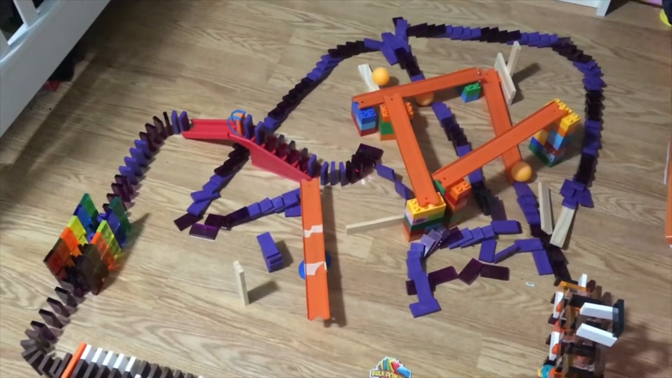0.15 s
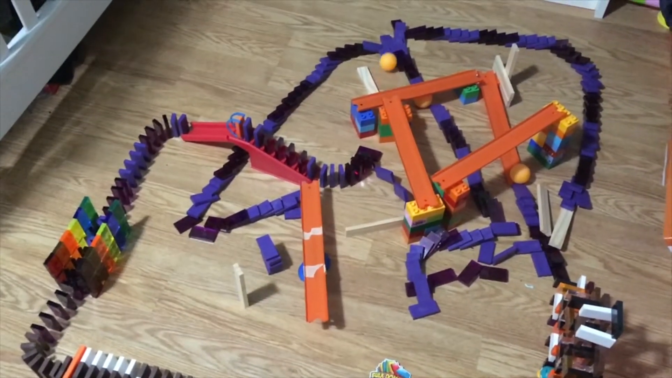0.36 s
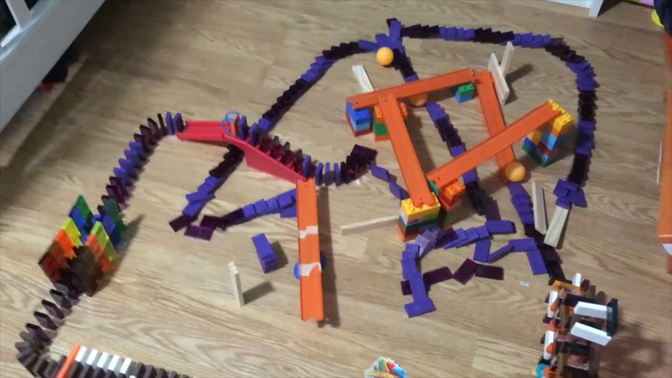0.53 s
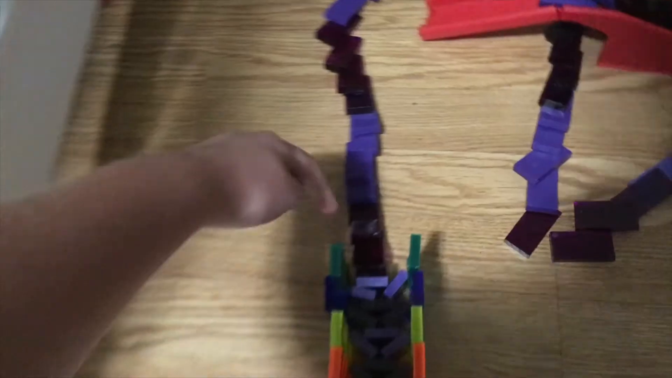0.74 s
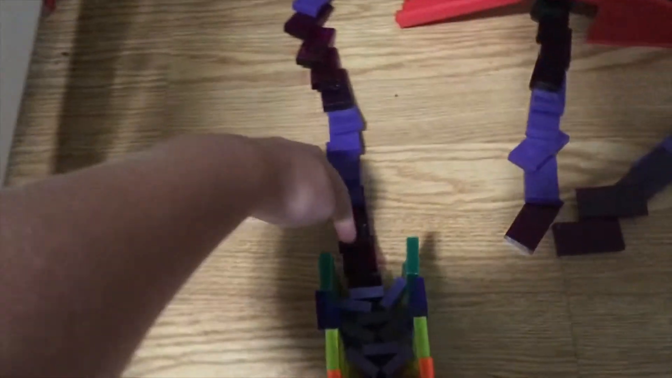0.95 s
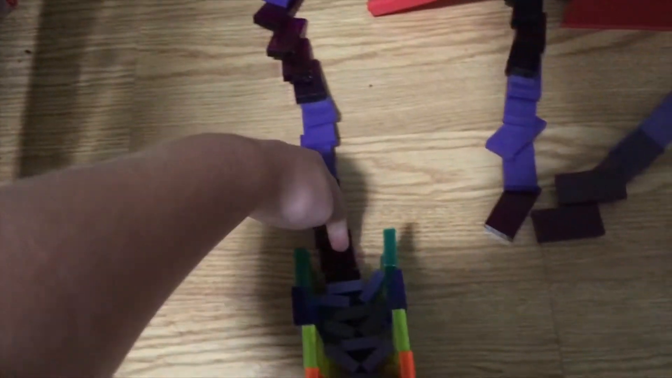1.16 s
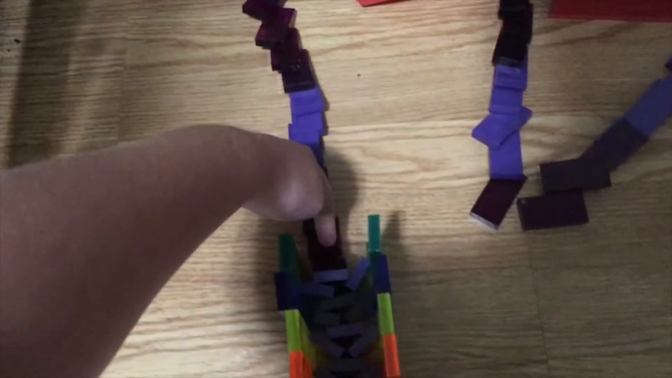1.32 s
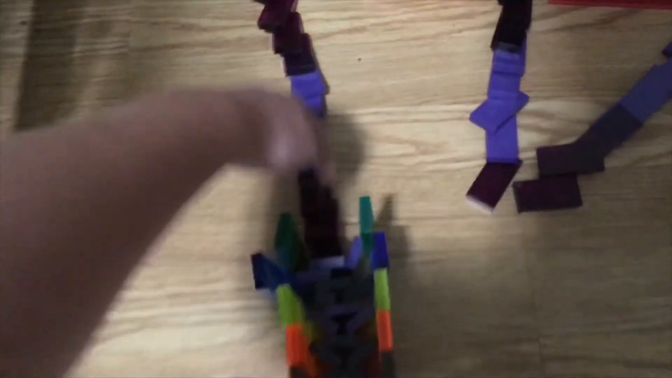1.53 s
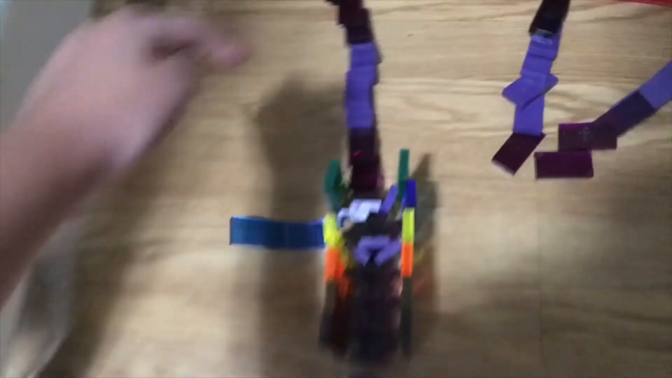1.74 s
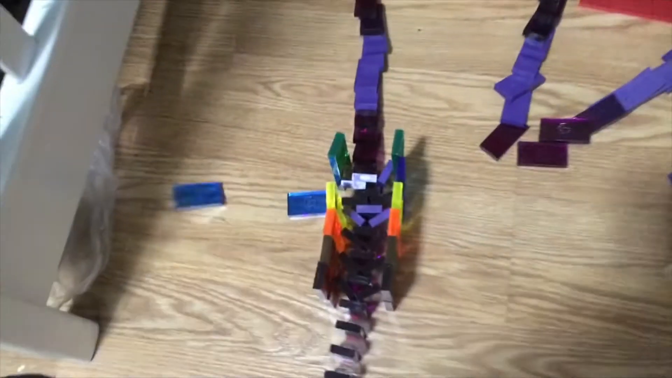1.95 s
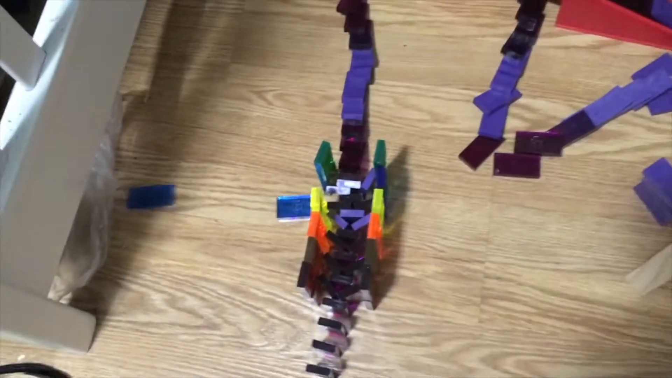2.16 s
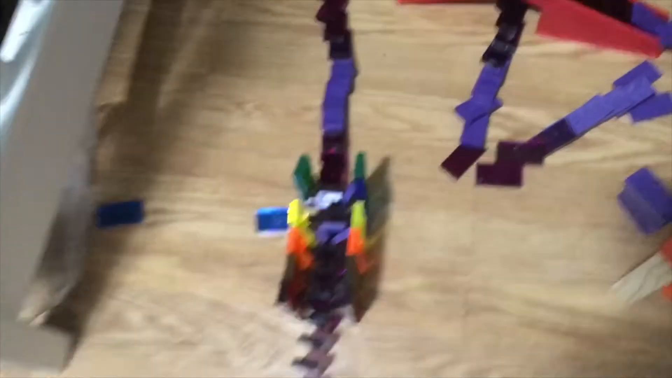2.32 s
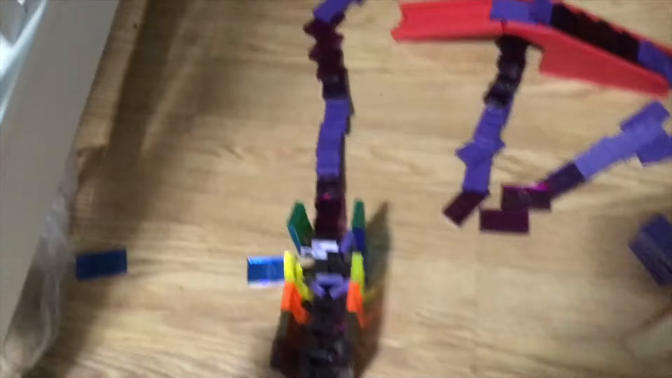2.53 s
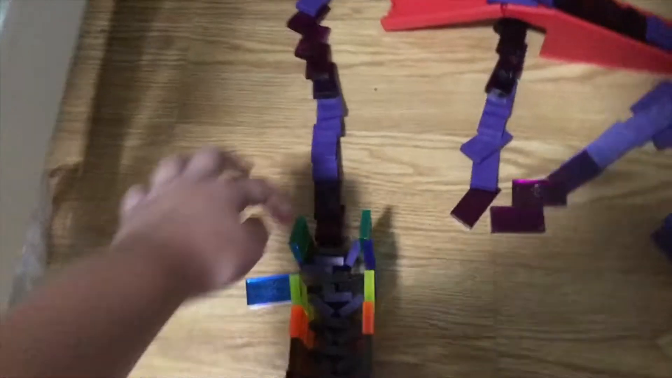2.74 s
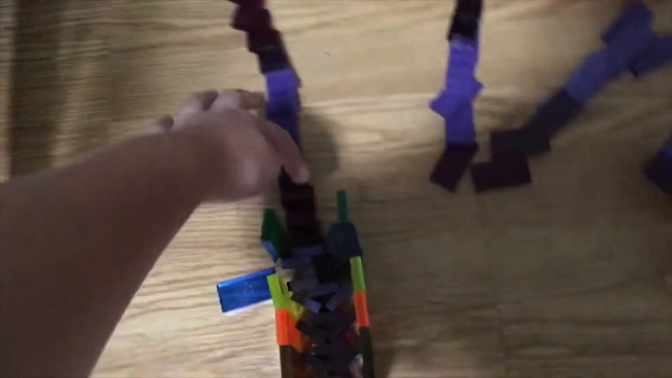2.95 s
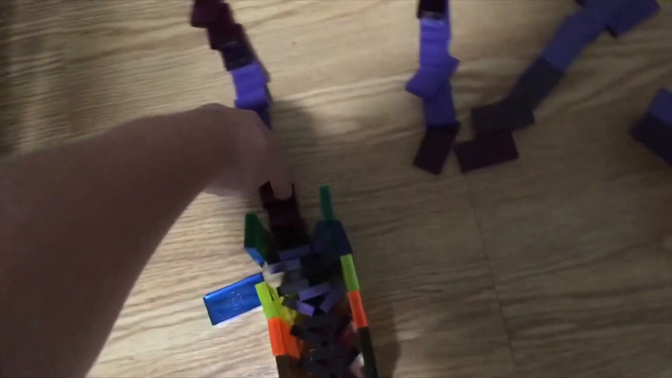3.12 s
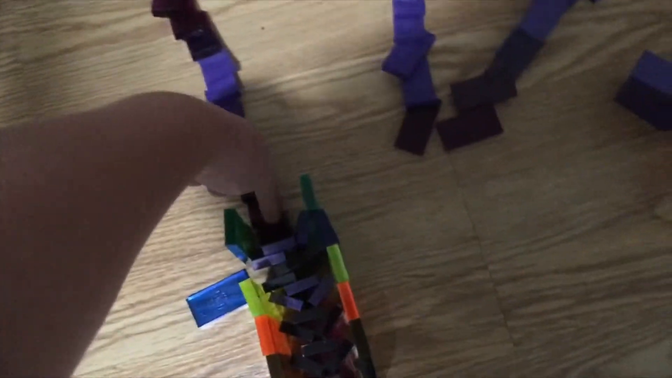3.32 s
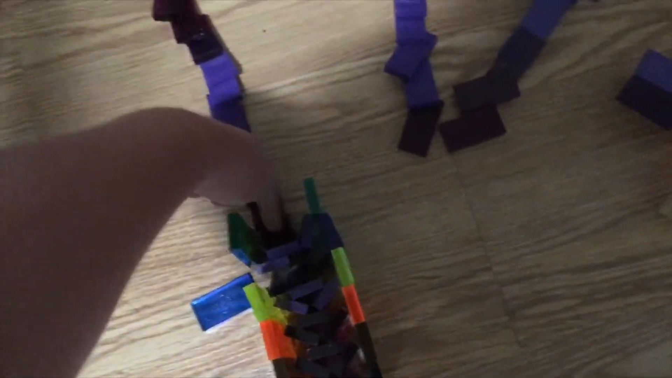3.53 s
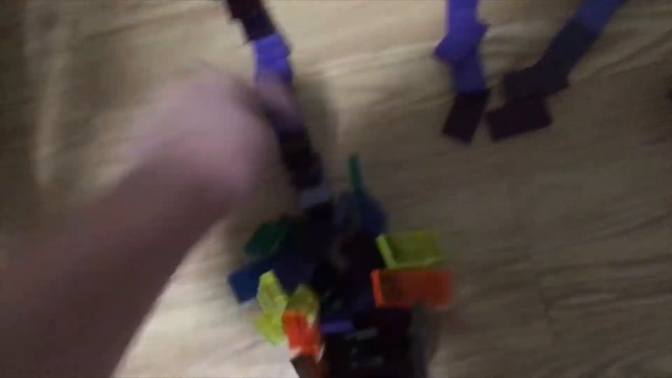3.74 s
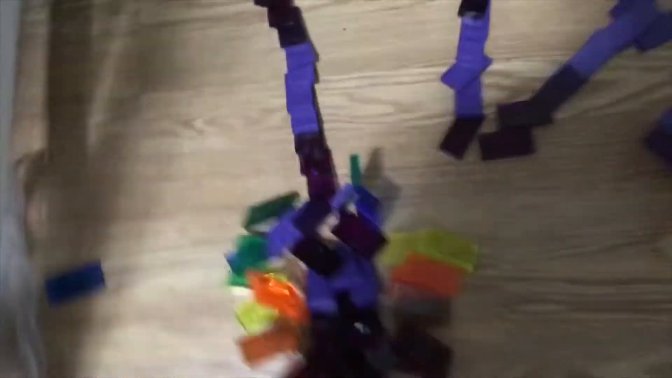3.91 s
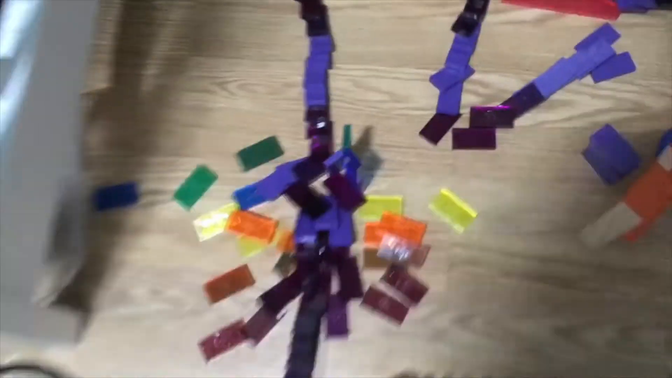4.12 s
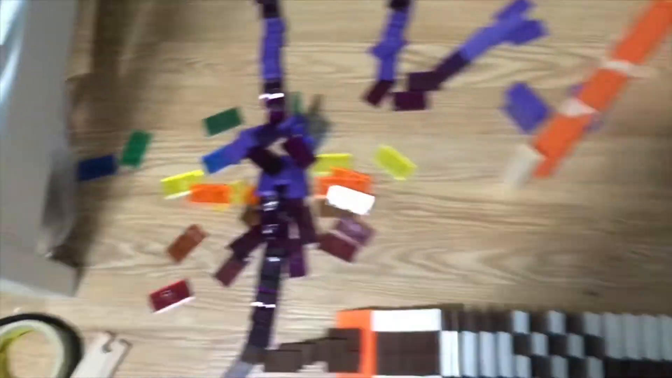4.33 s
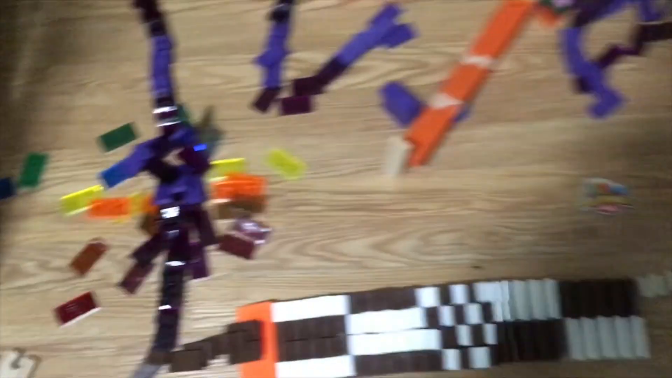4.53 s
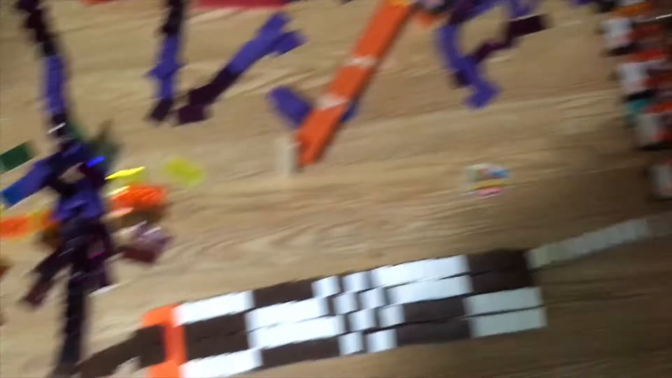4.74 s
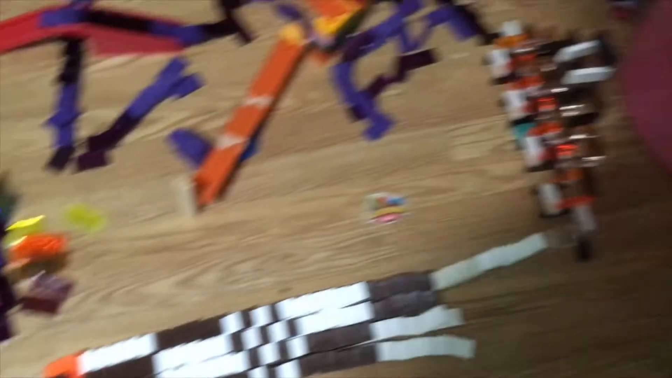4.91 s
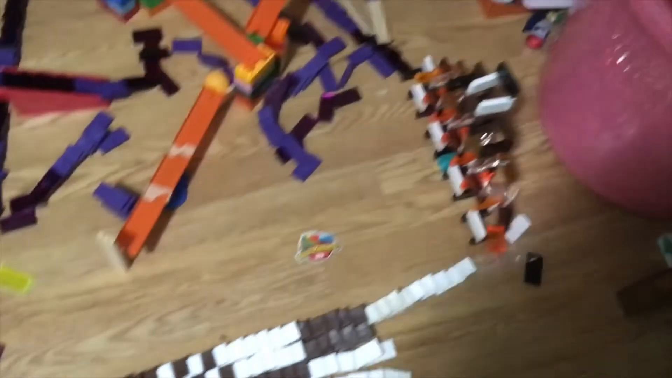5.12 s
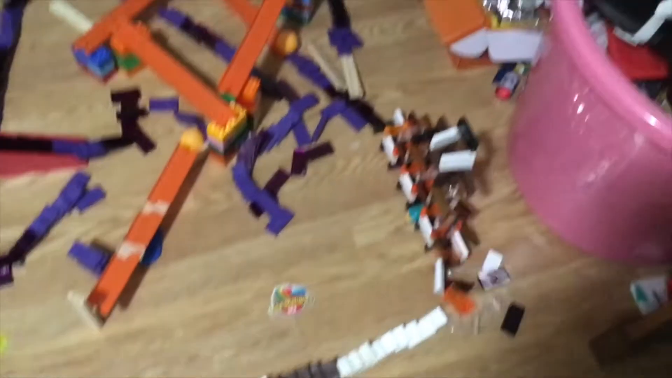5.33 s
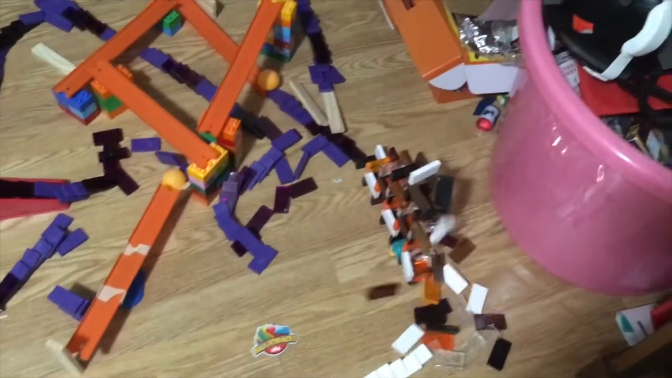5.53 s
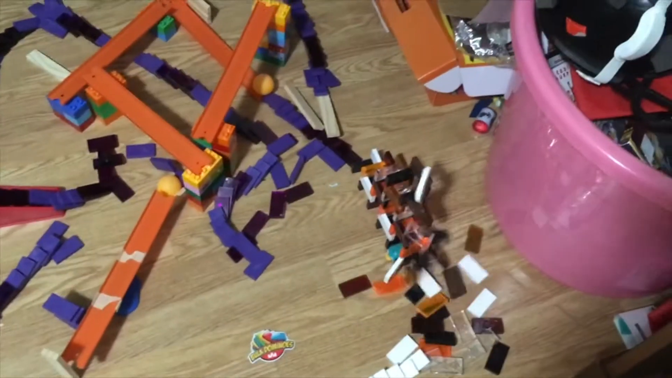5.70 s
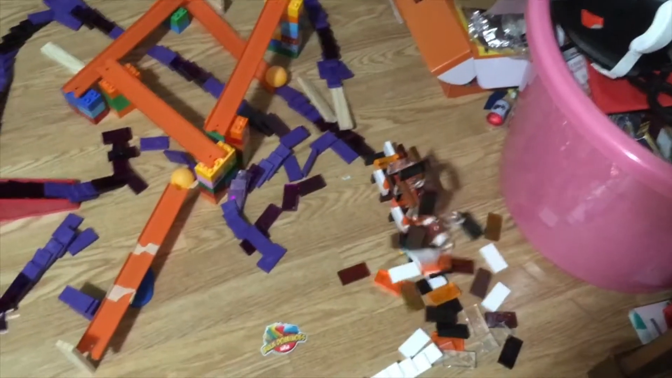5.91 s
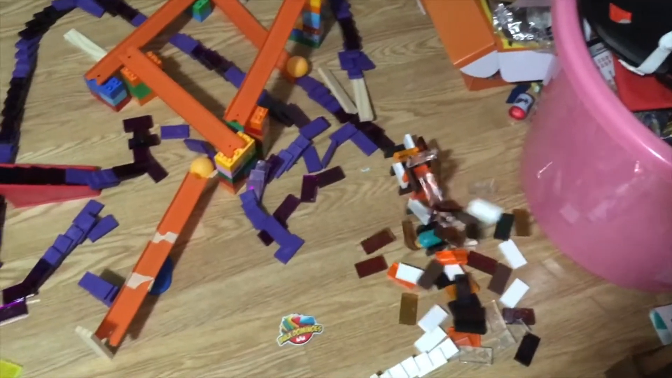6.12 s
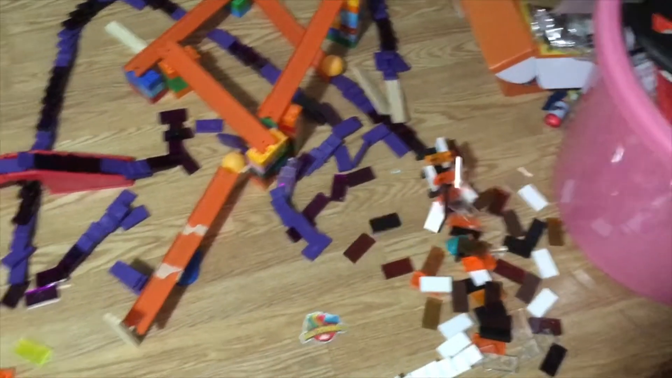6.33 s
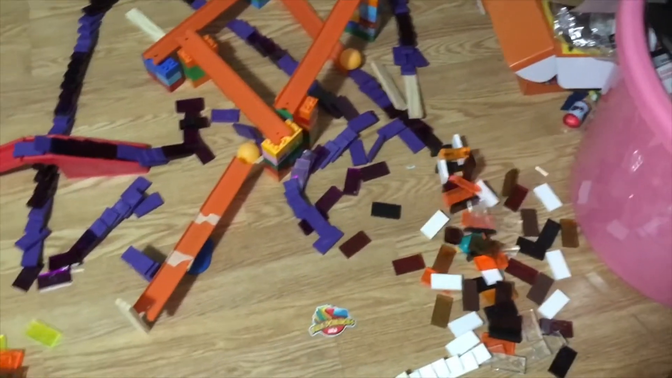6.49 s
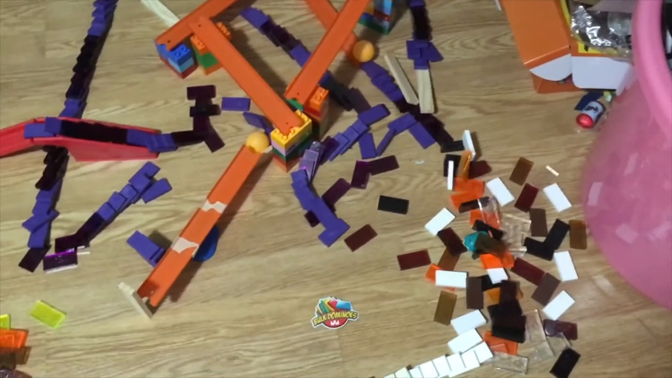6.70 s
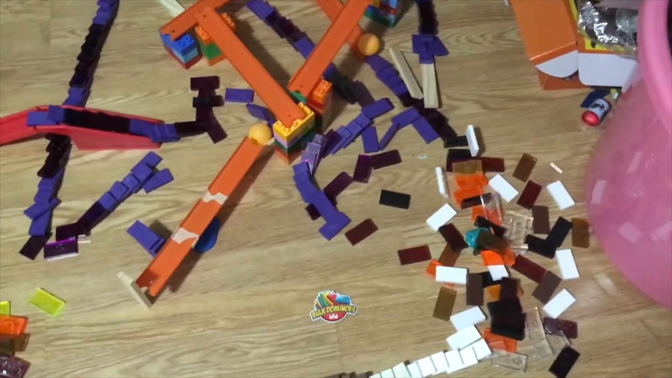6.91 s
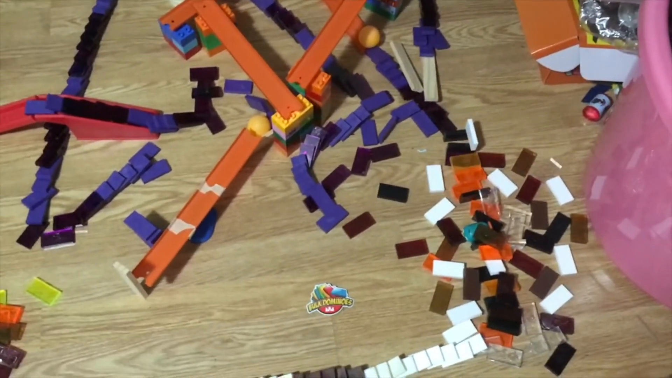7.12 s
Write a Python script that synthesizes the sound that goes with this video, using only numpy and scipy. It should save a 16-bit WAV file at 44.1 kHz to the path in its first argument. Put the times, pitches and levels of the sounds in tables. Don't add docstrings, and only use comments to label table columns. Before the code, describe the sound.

Wooden knocks, a loose plastic tile skittering, then a domino chain toppling in a fast rippling rattle and a long crumbling clatter indoors.

```python
import sys
import numpy as np
from scipy import signal
from scipy.fft import rfft, irfft
from scipy.io import wavfile
from scipy.ndimage import uniform_filter1d, minimum_filter1d

SR = 44100
rng = np.random.default_rng(int(sys.argv[2]) if len(sys.argv) > 2 else 0)


def level_to_linear(level):
    exponent = np.asarray(level, float) / 20
    return 10 ** exponent


def wav_out(sig):
    wavfile.write(sys.argv[1], SR, np.round(np.clip(np.atleast_2d(sig).T, -1, 1) * 32767).astype(np.int16))


N = 320166
NOW_S = np.arange(N) / SR


def rms_one(x):
    return x / np.sqrt(np.mean(x ** 2) + 1e-20)


def filtered(x, order, kind, hz):
    return signal.sosfilt(signal.butter(order, hz, kind, fs=SR, output="sos"), x)


def curve_db(points):
    s, level_db = np.transpose(points)
    return np.interp(NOW_S, s, level_db, left=-140, right=-140)


def clicks(s, level_db):
    out = np.full(N, 1e-12)
    np.add.at(out, (np.asarray(s) * SR).astype(int), level_to_linear(level_db))
    return out


def grains(per_s, spread_db):
    sizes = level_to_linear(spread_db * np.minimum(rng.exponential(1, N), 4)) * rng.choice([-1, 1], N)
    return rms_one(sizes * (rng.random(N) < per_s / SR)) + 1e-12


def contact(train, ms, per_s, first=2.2):
    decay = signal.lfilter([1], [1, -np.exp(-1000 / (ms * SR))], train)
    return first * train + decay * grains(per_s, spread_db=4.0)


def uneven_gain(level_db, spread_db, step, length):
    drawn_db = level_db + spread_db * rng.standard_normal(N // step + 1)
    return np.repeat(level_to_linear(drawn_db), step)[:length]


def body(x, resonances, uneven_db=1.4):
    out, power = 0, 0
    for k, (hz, width_hz, level_db) in enumerate(resonances):
        r = np.exp(-np.pi * width_hz / SR)
        b = np.array([1, 0, -1]) * (1 - r * r) / 2
        a = [1, -2 * r * np.cos(2 * np.pi * hz / SR), r * r]
        driven = x * uneven_gain(level_db, uneven_db, SR // 80, N)
        out = out + (-1) ** k * signal.lfilter(b, a, driven)
        power += level_to_linear(2 * level_db) * np.pi * width_hz / SR
    return out / np.sqrt(power)


def ringing(x, modes, detune, count):
    struck, step = np.flatnonzero(x), SR // 150
    start = struck[0]
    part = x[start:struck[-1] + SR // 5]
    out, length = np.zeros(N), len(part)
    dealt = np.repeat(rng.integers(0, count, N // step + 1), step)[:length]
    for tile, offset in enumerate(np.linspace(-detune, detune, count)):
        mine = part * (dealt == tile) + 1e-18
        for hz, level_db, t60_s in modes:
            r, w = level_to_linear(-60 / (t60_s * SR)), 2 * np.pi * hz * (1 + offset) / SR
            driven = mine * uneven_gain(level_db, 3, step, length)
            ring = signal.lfilter([0, np.sin(w)], [1, -2 * r * np.cos(w), r * r], driven)
            out[start:start + length] += ring
    return out


# (frequency [Hz], density [dB/Hz])
HISS = [(88, -31), (150, -1.5), (186, -8), (483, -17), (974, -22), (1300, -22.5), (2680, -31), (15800, -36)]
# (time [s], level [dB])
HANDLING = [(0.0, -78), (0.04, -65), (0.87, -67.5), (0.99, -59.5), (1.23, -68.5), (1.37, -52),
            (1.43, -62.5), (3.32, -66.5), (3.94, -57), (4.29, -72), (4.55, -56.5), (4.97, -68), (7.26, -69)]


def hush():
    hz = np.fft.rfftfreq(N, 1 / SR)
    log_hz, density_db = np.log(np.array(HISS)[:, 0]), np.array(HISS)[:, 1]
    gain = level_to_linear(np.interp(np.log(hz + 1), log_hz, density_db)) * (hz > 140)
    gain = gain * (1 + .5 * (hz / 13000) ** 4)
    hiss = rms_one(irfft(rfft(rng.standard_normal(N)) * gain, N))
    rumble = rms_one(filtered(rng.standard_normal(N), 2, "band", [36, 125]))
    s, rumble_db = np.transpose(HANDLING)
    return level_to_linear(-67.5) * hiss + level_to_linear(np.interp(NOW_S, s, rumble_db)) * rumble


# (time [s], knock [dB], tick [dB])
BLOCK = [(0.003, -32, -21.5), (0.1641, -18.5, -9.5), (0.1895, -59, -40.5), (0.278, -26.5, -24),
         (0.329, -33, -30), (0.395, -34, -29), (0.405, -44, -35), (0.42, -48, -55), (0.473, -46, -36.5),
         (0.518, -46.5, -55), (0.7107, -42.5, -33.5), (0.8, -59, -57), (0.021, -37, -38)]
# (time [s], level [dB])
BLOCK_ROLL = [(0.4, -42), (0.422, -49), (0.532, -52.5), (0.6, -81)]
# (frequency [Hz], width [Hz], level [dB])
WOOD = [(570, 190, 2.5), (1130, 740, 3.5), (1650, 1330, 1.5), (2630, 1820, -0.5), (3920, 1800, -7),
        (5440, 1200, -12.5)]
BLOCK_EDGE = [(4060, 2000, 0), (7110, 3500, -0.5), (11200, 4400, 2.5), (14600, 4200, -5.5)]
ROCKING = [(683, 250, 2), (1465, 550, 1.5), (2260, 620, -2.5), (4350, 270, -15)]
CASING = [(681, 340, -3), (1870, 1500, -7), (3510, 1100, -13)]


def wooden_block():
    s, knock_db, tick_db = np.transpose(BLOCK)
    far = NOW_S < .65
    knock = contact(clicks(s, knock_db + 7), ms=4.0, per_s=9900)
    tick = body(contact(clicks(s, tick_db - 6), ms=4.6, per_s=4800), BLOCK_EDGE)
    rocking = body(level_to_linear(curve_db(BLOCK_ROLL) - 2.5) * grains(810, spread_db=0.5), ROCKING)
    block = filtered(body(knock * far, WOOD) + rocking, 2, "high", 360) + tick * far
    touches = body(knock * ~far, CASING) + tick * ~far
    return block, touches


# (upper edge [Hz], level [dB], t60 [s])
ROOM = [(270, 3.5, 0.27), (700, -3, 0.26), (1830, 1, 0.2), (3760, 0.5, 0.22), (8200, -0.5, 0.2),
        (16100, -1, 0.13)]


def room(x):
    t, out, step = np.arange(SR // 2) / SR, 0, SR // 40
    spot = np.repeat(rng.integers(0, 4, N // step + 1), step)[:N]
    for k in range(4):
        tail, low_hz = 0, 90
        for high_hz, level_db, t60_s in ROOM:
            band = filtered(rng.standard_normal(len(t)), 2, "band", [low_hz, high_hz])
            decay = level_to_linear(-60 * t / t60_s) + 0.16 * level_to_linear(-32 * t / t60_s)
            tail = tail + band * level_to_linear(level_db) * decay
            low_hz = high_hz
        spectrum = rfft(tail, SR)
        power = np.abs(spectrum) ** 2
        even = np.sqrt(uniform_filter1d(power, size=800) / uniform_filter1d(power, size=100))
        tail = irfft(spectrum * even, SR)[:len(t)]
        onset = np.clip((t - .002) / 0.00055, 0, 1)
        out = out + signal.fftconvolve(x * (spot == k), tail * onset)[:N]
    return out


# (time [s], level [dB])
RUSTLE = [
    [(1.3, -93), (1.388, -91), (1.522, -78), (1.75, -68.5)],
    [(2.36, -71), (2.55, -63.5), (2.63, -59.5), (2.7, -56), (2.76, -66.5), (2.9, -86)],
]


def rustle():
    level = sum(level_to_linear(curve_db(span)) for span in RUSTLE)
    return level * signal.lfilter([1], [1, -.3], grains(6000, spread_db=-7.0))


# (time [s], knock [dB], tick [dB], ring [dB])
LOOSE = [(1.3361, -44.5, -56.5, -63), (1.4264, -29, -47, -39), (1.4532, -27, -16.5, -29.5),
         (1.668, -43.5, -65.5, -69), (1.7006, -72.5, -82.5, -68.5), (1.7853, -56.5, -61.5, -52.5),
         (1.8083, -8.5, -2.5, -2.5), (1.8135, -8.5, -21.5, -12), (1.8274, -7.5, -18, -5.5),
         (1.8543, -33, -32, -43), (1.8892, -29.5, -23.5, -19.5), (1.9085, -12.5, -48, -64),
         (1.936, -16, -68, -53.5), (1.9663, -24.5, -78, -56.5), (1.9985, -17, -34.5, -52),
         (2.03, -9.5, -10.5, -4.5), (2.0345, -31, -11.5, -28), (2.0395, -24, -19, -17.5),
         (2.065, -61, -60, -27), (2.122, -14.5, -31.5, -58), (2.138, -11, -9.5, -11),
         (2.1426, -30.5, -21, -10.5), (2.1987, -19.5, -25.5, -20), (2.2256, -26, -43.5, -36.5),
         (2.2348, -21, -17, -16.5), (2.2542, -21.5, -44, -19.5), (2.283, -24, -28, -60),
         (2.3, -25, -65, -60), (3.662, -34, -21, -33)]
SMALL_TOWER = [(3.6015, -58, -79, -61.5), (3.6085, -49, -68, -68), (3.6234, -29, -95, -57),
               (3.6324, -34, -79, -62), (3.6525, -23, -36, -28.5), (3.6699, -28, -26.5, -25.5),
               (3.6803, -45, -47, -34), (3.6892, -21, -41, -39), (3.6983, -50, -34, -48),
               (3.7077, -34, -60, -36), (3.7541, -25, -53, -37), (3.7618, -35, -36, -43),
               (3.7721, -54, -40, -50.5), (3.7806, -44, -40, -40), (3.7887, -39, -44.5, -32),
               (3.8077, -25, -27, -35), (3.823, -7.5, -19, -7), (3.831, -24, -11.5, -4.5),
               (3.8437, -26, -19, -27), (3.8719, -24.5, -30, -9), (3.8809, -37.5, -28, -44),
               (3.8982, -25, -28, -40), (3.9105, -9.5, -4, -11), (3.926, -39, -28, -25),
               (3.9523, -17, -21, -8.5), (3.9776, -26, -20.5, -26.5), (3.9987, -25, -14, -40),
               (4.0184, -14.5, -33, -19.5), (4.024, -35.5, -18, -13.5), (4.0445, -17, -29, -44),
               (4.0558, -18, -43, -25), (4.0671, -22, -12.5, -32), (4.0935, -17.5, -44, -35),
               (4.118, -24, -24, -22.5), (4.1362, -23, -26, -40), (4.1453, -39, -31, -32),
               (4.1549, -27, -19, -20), (4.1628, -17, -17, -21), (4.178, -33, -37, -20.5),
               (4.189, -24, -19.5, -37), (4.225, -19.5, -20.5, -18), (4.24, -28, -17, -16),
               (4.2847, -21, -17.5, -17.5), (4.3253, -26, -23.5, -39), (4.3478, -47, -23, -29),
               (4.3578, -23, -56, -52)]
TALL_TOWER = [(5.048, -37, -36, -31), (5.0557, -30, -25, -24.5), (5.0708, -17, -5.5, -18),
              (5.0828, -29, -27.5, -18), (5.1052, -16.5, -28, -27), (5.123, -27.5, -25, -37),
              (5.13, -33, -30, -36), (5.159, -21, -20, -20.5), (5.1869, -22.5, -19.5, -26),
              (5.195, -14.5, -20, -23), (5.2148, -25, -37, -38), (5.2337, -24, -42, -46),
              (5.261, -15.5, -18.5, -15.5), (5.2866, -14, -39.5, -36), (5.2994, -34, -44, -46),
              (5.3194, -27.5, -21, -35), (5.3279, -16.5, -47, -49), (5.3484, -30, -58.5, -47),
              (5.3606, -24, -23.5, -24.5), (5.3944, -31.5, -17.5, -25), (5.3997, -16.5, -8.5, -34),
              (5.413, -18, -24, -30.5), (5.4221, -19, -33, -13), (5.4319, -12, -16, -20),
              (5.4448, -33, -14.5, -35), (5.4558, -25, -35, -45), (5.4639, -18.5, -18, -19),
              (5.4724, -21.5, -47, -30), (5.486, -28, -35, -35), (5.5052, -9.5, -3.5, -8),
              (5.5187, -30, -42, -30), (5.5227, -26.5, -15.5, -26.5), (5.546, -23, -11.5, -13),
              (5.56, -26, -16, -28), (5.572, -27, -37, -39.5), (5.583, -26.5, -48, -22.5),
              (5.596, -21, -23.5, -30.5), (5.6156, -27, -20, -30.5), (5.6278, -21, -33, -12.5),
              (5.638, -36, -24, -16), (5.65, -32, -22, -39), (5.657, -42, -33, -23),
              (5.6678, -44, -32, -30), (5.675, -45, -24.5, -16), (5.6949, -20.5, -31, -5)]
MIDDLE = [(5.705, -16.5, -8.5, -30), (5.7165, -41, -13, -30), (5.7386, -47, -37, -38),
          (5.7527, -43, -24, -21), (5.762, -42, -34, -47), (5.7676, -17, -31.5, -43),
          (5.7809, -7, -24, -21), (5.7917, -37, -6.5, -18), (5.819, -38, -37, -43), (5.8482, -40, -29, -41),
          (5.8525, -37, -22.5, -25), (5.8843, -44, -29.5, -42), (5.9098, -22, -16, -26),
          (5.9178, -22, -17, -41), (5.9339, -37, -24, -36), (5.939, -40, -22, -25),
          (5.948, -33, -15.5, -27), (5.96, -18, -43, -25), (5.9702, -20, -24, -23),
          (5.9888, -20.5, -26, -22), (6.001, -24, -31, -21), (6.009, -17, -21, -13), (6.018, -24, -16, -35),
          (6.04, -20.5, -26, -31), (6.0535, -17, -14.5, -14.5), (6.0728, -20.5, -12.5, -15.5),
          (6.0853, -21, -21.5, -14), (6.0914, -20, -41, -14), (6.11, -19, -42, -39),
          (6.117, -16, -34, -20.5), (6.1344, -21, -12, -22), (6.1434, -21, -19.5, -29),
          (6.1636, -16, -43, -22.5), (6.171, -25, -21, -18.5), (6.1845, -22.5, -31, -25),
          (6.2041, -19.5, -19, -22), (6.2198, -21, -20, -16), (6.2303, -19.5, -25, -23),
          (6.2408, -19, -15, -20), (6.2476, -24, -10, -29), (6.2552, -44, -18, -17.5),
          (6.278, -20.5, -33, -21.5), (6.2882, -26, -23.5, -39), (6.3234, -20.5, -25, -15.5)]
CRUMBLE = [(6.341, -21, -17, -13.5), (6.3474, -23.5, -11, -5), (6.3654, -39, -34, -34),
           (6.372, -34, -30, -43), (6.4, -27, -39, -45), (6.41, -33, -33, -29.5), (6.421, -42, -20, -14.5),
           (6.428, -27, -24, -28), (6.477, -25, -24, -17), (6.487, -22, -47, -20),
           (6.4947, -14, -11.5, -23.5), (6.5111, -23, -31, -22.5), (6.5189, -22, -11, -19),
           (6.5464, -15.5, -34, -38), (6.574, -29, -30, -23.5), (6.5822, -16.5, -19.5, -19),
           (6.589, -36, -26, -25), (6.605, -20, -25, -29), (6.6222, -22, -23, -14.5),
           (6.6405, -42, -21, -20), (6.66, -41, -35, -23), (6.666, -24.5, -17, -43),
           (6.6771, -29, -16.5, -20.5), (6.692, -30, -18, -18.5), (6.7146, -37, -21, -29.5),
           (6.7253, -28, -27, -16), (6.7437, -35, -33, -44), (6.75, -35, -30, -31), (6.7561, -28, -25, -27),
           (6.7671, -36, -18, -38), (6.789, -30, -47, -38), (6.7999, -24, -30.5, -25),
           (6.8075, -28, -21, -32), (6.86, -27, -27.5, -34.5), (6.887, -31, -27.5, -38),
           (6.898, -23, -21, -35), (6.929, -21.5, -24.5, -24.5), (6.945, -28, -29, -24.5),
           (6.9607, -39, -31.5, -34), (6.9803, -27.5, -59, -33), (6.991, -43, -49, -29),
           (7.0138, -35, -44, -32.5), (7.0228, -22.5, -23.5, -20), (7.0375, -20, -19, -24.5),
           (7.05, -52, -35, -49), (7.0577, -39, -26, -44)]


def landings():
    towers = np.vstack([SMALL_TOWER, TALL_TOWER, MIDDLE, CRUMBLE]) + [0, 7, 7.5, 6.5]
    return np.vstack([LOOSE, towers]).T


# (time [s], level [dB])
TUMBLE = [
    [(3.6, -81), (3.66, -79), (3.81, -41.5), (3.982, -27), (4.37, -36.5)],
    [(4.38, -31), (4.464, -34), (4.6, -37), (4.674, -27), (5.04, -32.5)],
    [(5.05, -37), (5.288, -31), (5.385, -33)],
    [(5.4, -23), (6.022, -27), (6.888, -32), (6.958, -37), (7.08, -37)],
]
# (time [s], level [dB])
SCRAPE = [
    [(1.345, -68), (1.365, -59), (1.42, -54), (1.45, -35), (1.47, -64.5), (1.5, -74.5)],
    [(3.6, -61), (3.64, -48.5), (3.665, -24.5), (3.72, -46), (3.78, -41.5), (3.82, -24.5)],
]
# (frequency [Hz], width [Hz], level [dB])
LAMINATE = [(572, 292, -9), (1100, 590, -3.5), (1770, 1020, -2.5), (3060, 2260, 0.5), (4110, 1810, 0.5),
            (5500, 3100, -18)]
FLAT_SIDE = [(714, 630, -1.5), (1047, 810, 3), (1367, 880, 1)]
BOARDS = [(155, 15, -3), (255, 42, -0.5), (412, 85, -5)]
PUSHED = [(1050, 1120, -5), (1690, 515, 1.5)]
TICK = [(6130, 1200, -4.5), (9390, 1530, 2), (11540, 9000, -2), (13600, 2200, 2.5)]
# (frequency [Hz], level [dB], t60 [s])
TILE = [(5610, -1.5, .05), (5405, -12, .035), (6160, -11, .045), (12900, -3.5, .03), (13950, -5, .03),
        (10590, -21, .02)]
LONE_TILE = [(5597, 0, .052), (6130, -12, .07), (12890, -6, .045), (13920, -7, .06)]
SKITTER_START_S, SKITTER_END_S = 1.7, 3.0
FIELD_START_S, FIELD_END_S, CLEAR_FROM_S, LAST_FROM_S = 4.38, 4.8, 4.81, 4.95


def free_tiles():
    s, knock_db, tick_db, ring_db = landings()
    tumble_db = curve_db(np.vstack(TUMBLE))
    lone = (NOW_S > SKITTER_START_S) & (NOW_S < SKITTER_END_S)
    loose = np.where((NOW_S > FIELD_START_S) & (NOW_S < LAST_FROM_S), .2, 1)
    clatter = loose * grains(2500, spread_db=3.0)
    scrape = sum(level_to_linear(curve_db(span)) for span in SCRAPE)

    flat = np.clip((knock_db - tick_db - 3) / 16, .03, np.where(s < SKITTER_END_S, .995, .55))
    edge_knocks = clicks(s, knock_db - 1 + 10 * np.log10(1 - flat))
    knock = contact(edge_knocks, ms=5.44, per_s=8300) + level_to_linear(tumble_db + 1.5) * clatter
    thud = contact(clicks(s, knock_db - 0.5 + 10 * np.log10(flat)), ms=2.1, per_s=11000)
    tick = contact(clicks(s, tick_db), ms=2.53, per_s=7000) + level_to_linear(tumble_db - 6.5) * clatter
    pushed = body(scrape * grains(2500, spread_db=5.0), PUSHED)
    flat_side = filtered(1.11 * body(thud, FLAT_SIDE), 1, "band", [480, 2000])
    clacks = body(knock, LAMINATE) + flat_side + body(tick, TICK) + pushed

    rattle = (loose ** 2 * level_to_linear(tumble_db - 35) + level_to_linear(-43) * scrape) * grains(700, spread_db=4.5)
    strike = contact(clicks(s, ring_db - 26.5), ms=3.6, per_s=3000, first=7.1) + rattle
    rings = ringing(strike * lone, LONE_TILE, detune=.0015, count=2)
    rings = rings + ringing(strike * ~lone, TILE, detune=.007, count=5)

    boom = level_to_linear(tumble_db - 21) * body(grains(500, spread_db=4.0), BOARDS, uneven_db=3.0)
    shake_db = np.where(lone, -33, -25)
    boom = boom + level_to_linear(shake_db) * body(knock + thud + 3 * pushed, BOARDS)
    return clacks + rings + boom


# (time [s], knock [dB], tick [dB])
ROWS = [(4.383, -22.5, -13), (4.4059, -24.5, -18), (4.4273, -21.5, -25), (4.45, -21.5, -24),
        (4.469, -18, -19), (4.49, -15.5, -16), (4.509, -17.5, -25), (4.5142, -26, -29), (4.527, -20, -18),
        (4.5327, -17, -35), (4.5492, -23.5, -32), (4.567, -15, -26), (4.5912, -20.5, -12),
        (4.6114, -16, -13.5), (4.6287, -20, -14), (4.648, -15, -30), (4.669, -25.5, -36), (4.686, -19, -27),
        (4.706, -20, -17), (4.721, -22, -34), (4.727, -20, -16.5), (4.745, -18, -31), (4.762, -25, -36),
        (4.769, -32, -29), (4.7837, -50, -29.5), (4.7925, -24.5, -28)]
LINE = [(4.813, -20.5, -12), (4.821, -2, -4), (4.836, -7, 2), (4.862, -9.5, -20), (4.884, -12, 6.5),
        (4.9027, -22, -18), (4.9174, -13.5, 3), (4.937, -18.5, -17.5), (4.959, -21, -28), (4.974, -9, -10),
        (5.008, -36, -12)]


def falling_rows():
    return np.vstack([np.array(ROWS) + [0, 7.5, 13.5], LINE]).T


def gliding(x, start_s, end_s, start_hz, end_hz, width_hz):
    out, state, r = np.zeros(N), np.zeros(2), np.exp(-np.pi * width_hz / SR)
    for i in range(int(FIELD_START_S * SR), int((LINE[-1][0] + .1) * SR), 256):
        hz = np.interp(i / SR, [start_s, end_s], [start_hz, end_hz])
        a = [1, -2 * r * np.cos(2 * np.pi * hz / SR), r * r]
        out[i:i + 256], state = signal.lfilter([1, 0, -1], a, x[i:i + 256], zi=state)
    return out * (1 - r * r) / 2 / np.sqrt(np.pi * width_hz / SR)


# (start [s], end [s], start [Hz], end [Hz], width [Hz], level [dB])
HOLLOW = [
    (4.4, 4.8, 1550, 2200, 800, -5),
    (4.45, 5.0, 4180, 4620, 250, -11),
]
# (frequency [Hz], width [Hz], level [dB])
FIELD = [(900, 1100, -1), (3380, 2140, -1), (5900, 1860, 2.5), (7570, 530, -12), (9430, 620, 0),
         (10920, 750, -0.5), (14100, 3120, -5.5)]
# (frequency [Hz], level [dB], t60 [s])
CLEAR_TILE = [(10600, -6, .015), (11430, -1.5, .025)]
LAST_TILE = [(4600, -3, .04), (5420, 0, .045), (11430, -6, .03), (12700, -8, .025), (13700, 0, .025)]


def field():
    s, knock_db, tick_db = falling_rows()
    spread = signal.windows.tukey(SR // 110, .6)
    slip = (NOW_S > FIELD_START_S) * (NOW_S < LAST_FROM_S + .08)
    sliding = level_to_linear(np.interp(NOW_S, [FIELD_START_S, FIELD_END_S], [-35, -28])) * slip
    falling = signal.fftconvolve(clicks(s, knock_db - 14), spread)[:N]
    rows = (falling + sliding) * grains(14000, spread_db=4.0)
    ticks = contact(clicks(s, tick_db - 15), ms=3.0, per_s=7000)
    piled = rows * np.where(NOW_S > CLEAR_FROM_S, level_to_linear(-2), 1)

    hollow = sum(level_to_linear(level_db) * gliding(piled, *glide) for *glide, level_db in HOLLOW)
    hollow = hollow * np.interp(NOW_S, [CLEAR_FROM_S, LAST_FROM_S], [1, .6])
    clack = body(piled, FIELD, uneven_db=2.5) + hollow + body(ticks, TICK)

    clear_rows = rows * (NOW_S > CLEAR_FROM_S) * (NOW_S < LAST_FROM_S)
    clear = ringing(clear_rows, CLEAR_TILE, detune=.0037, count=3)
    last = ringing(rows * (NOW_S > LAST_FROM_S), LAST_TILE, detune=.005, count=3)
    return clack + level_to_linear(-25.5) * clear + level_to_linear(-26) * last


def scene():
    block, touches = wooden_block()
    tiles = filtered(free_tiles() + field(), 4, "high", 125)
    wet = room(level_to_linear(-34) * tiles + level_to_linear(-33) * block)
    return (tiles + block + touches + wet + rustle() + hush())[None]


def roll_off(x):
    return signal.sosfilt(signal.butter(12, 16980, fs=SR, output="sos"), x)


def record(dry):
    headroom = minimum_filter1d(np.minimum(1, .45 / (np.abs(dry) + 1e-9)), size=177, axis=1)
    limited = dry * uniform_filter1d(headroom, size=89, axis=1)
    cut = signal.cheby2(16, 36, 16050, fs=SR, output="sos")
    return roll_off(signal.sosfilt(cut, limited))


dry = scene()
out = record(dry)
wav_out(out)
```